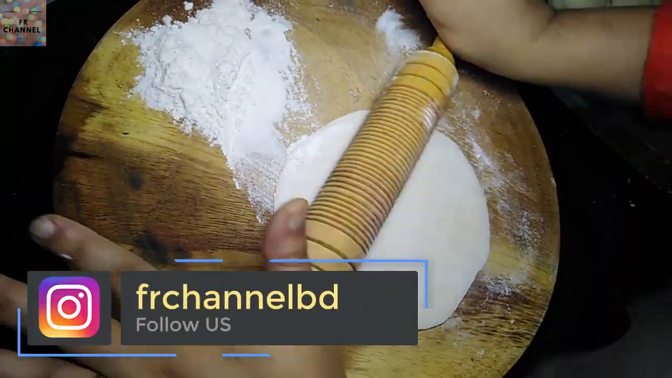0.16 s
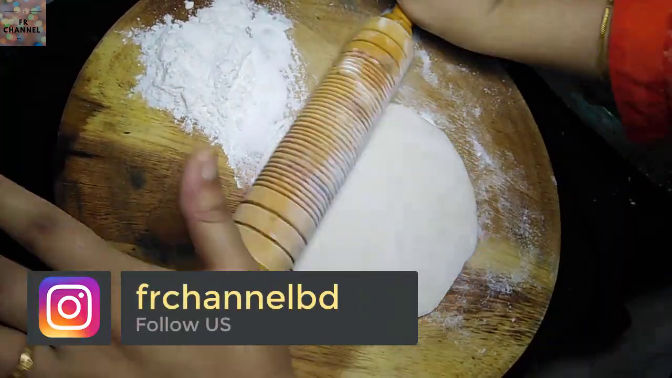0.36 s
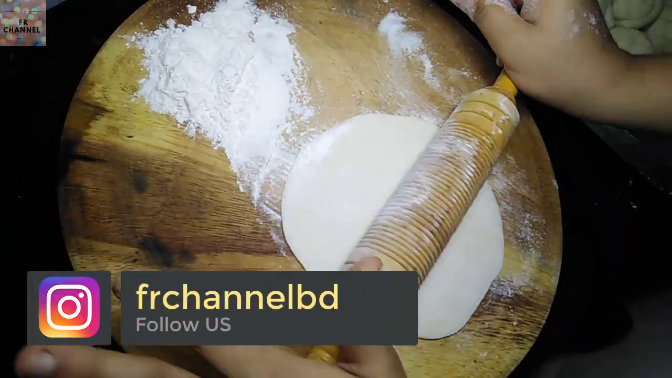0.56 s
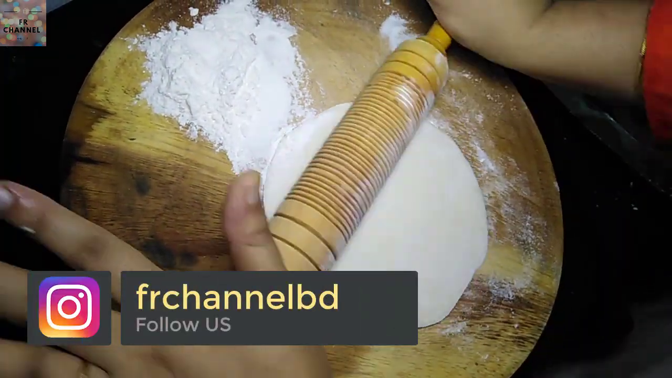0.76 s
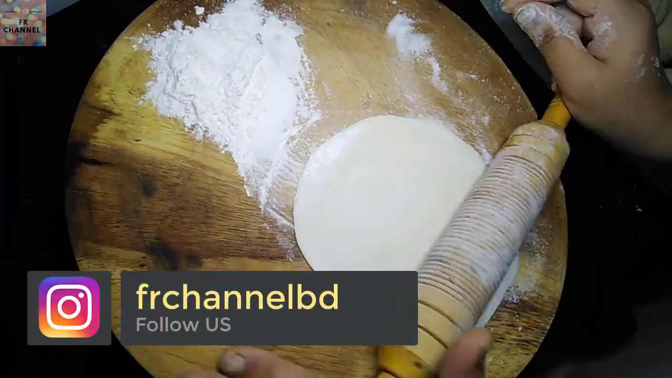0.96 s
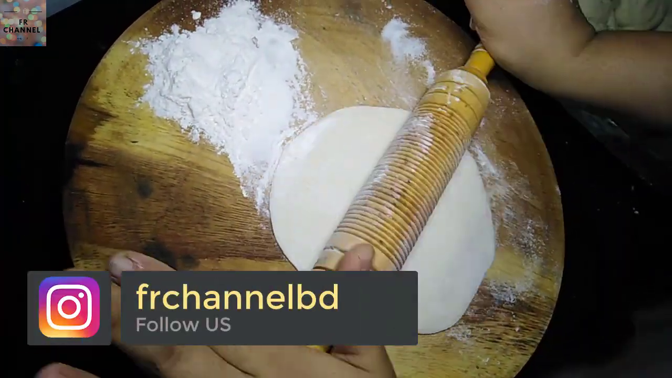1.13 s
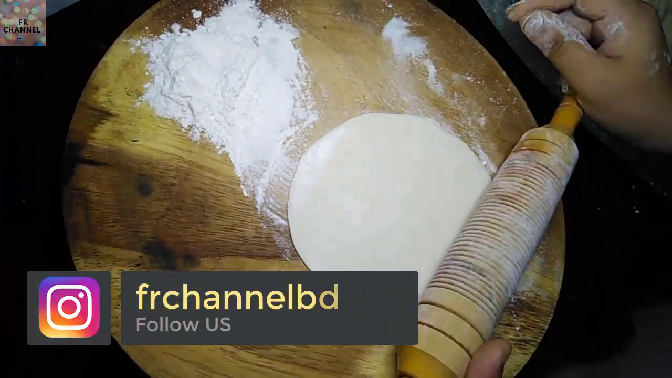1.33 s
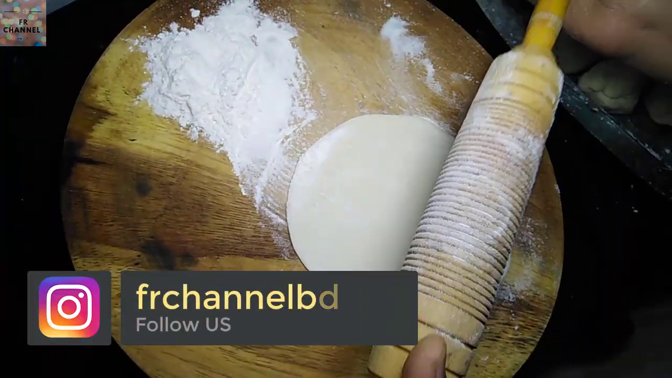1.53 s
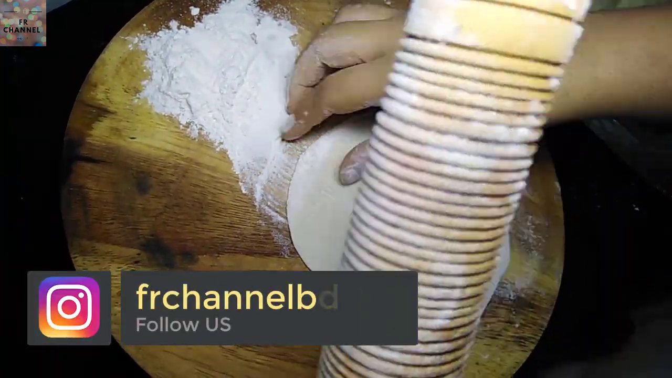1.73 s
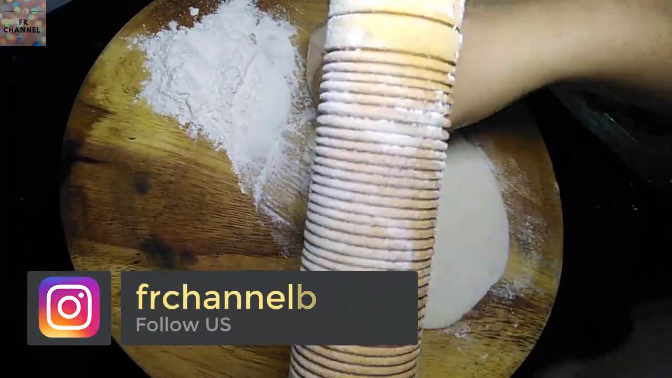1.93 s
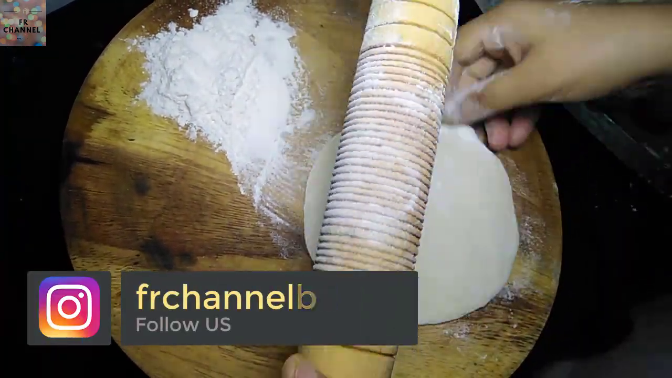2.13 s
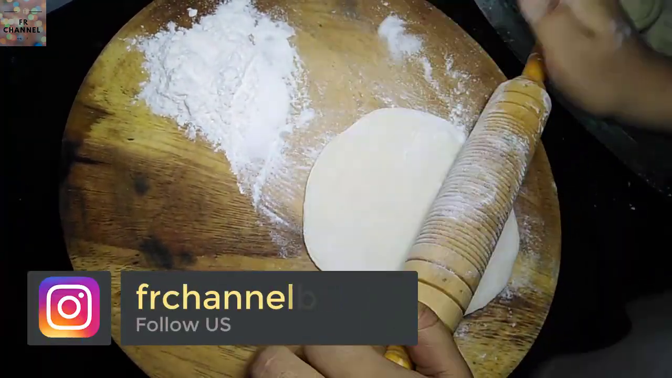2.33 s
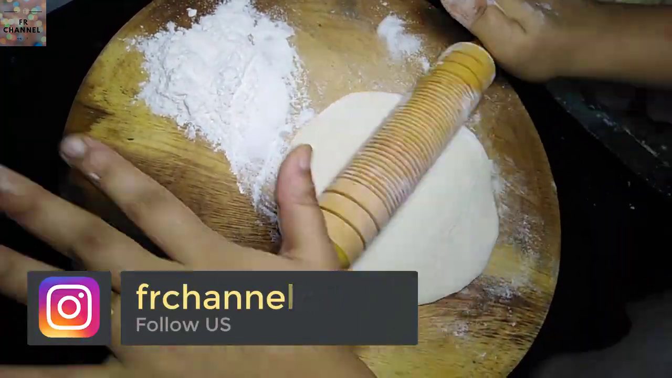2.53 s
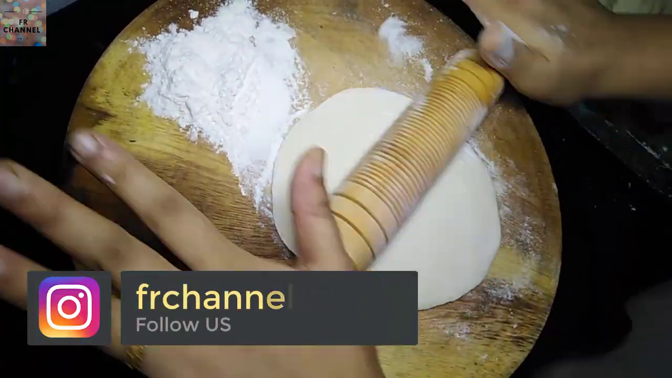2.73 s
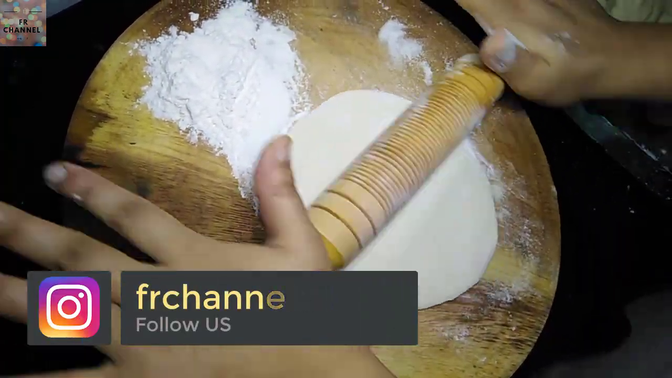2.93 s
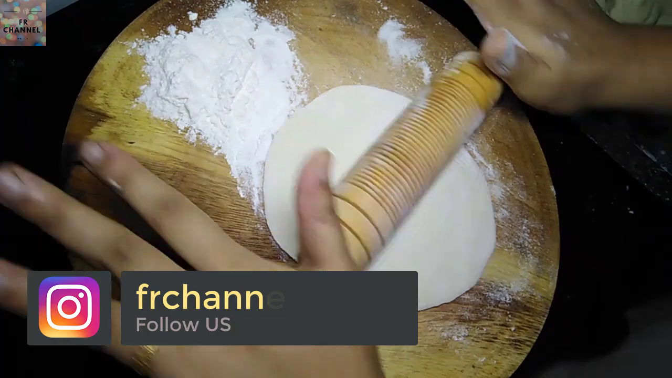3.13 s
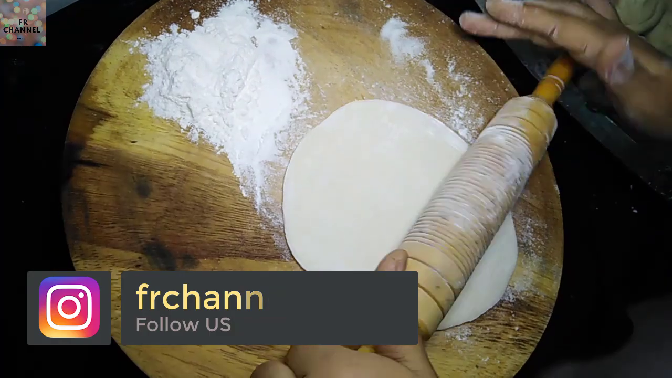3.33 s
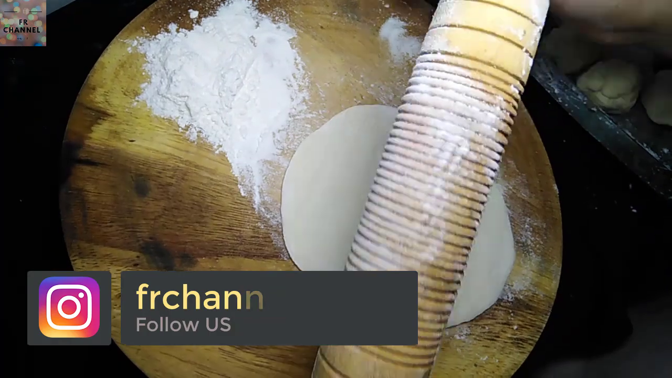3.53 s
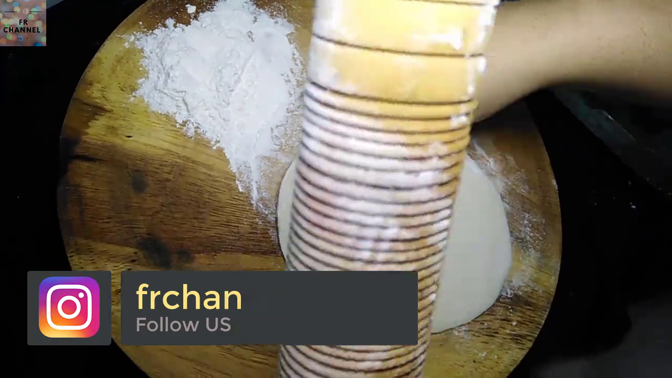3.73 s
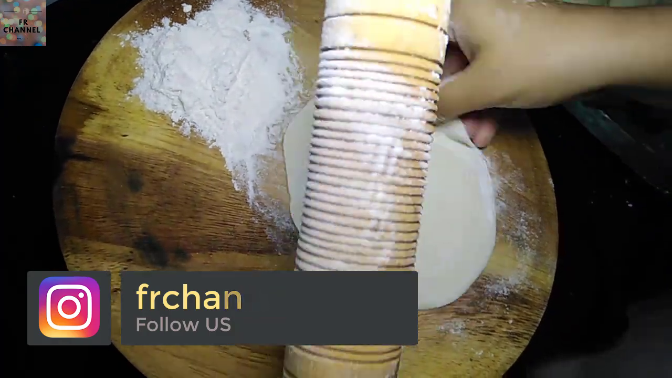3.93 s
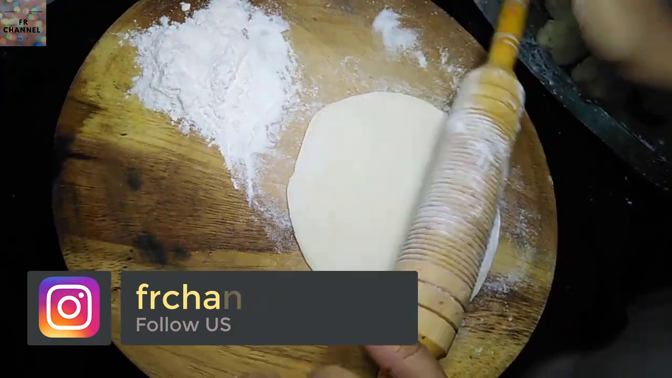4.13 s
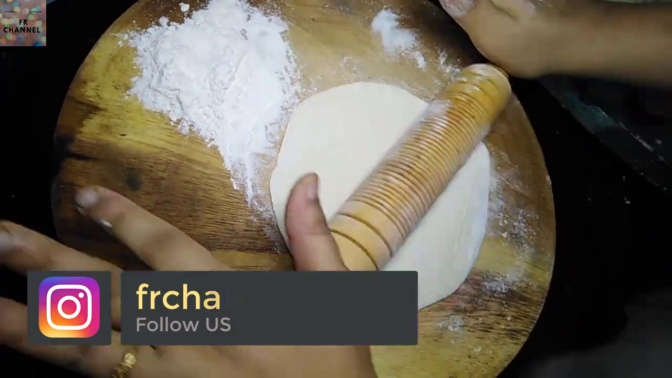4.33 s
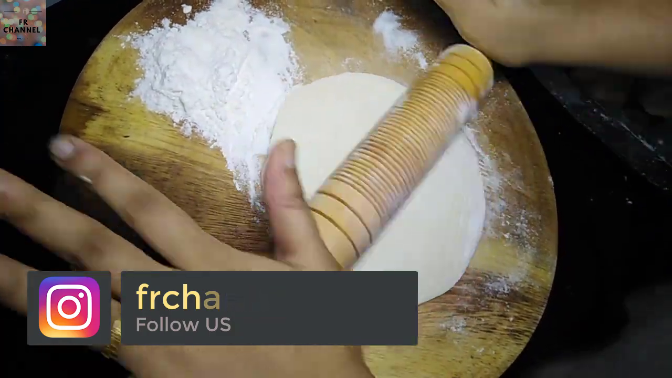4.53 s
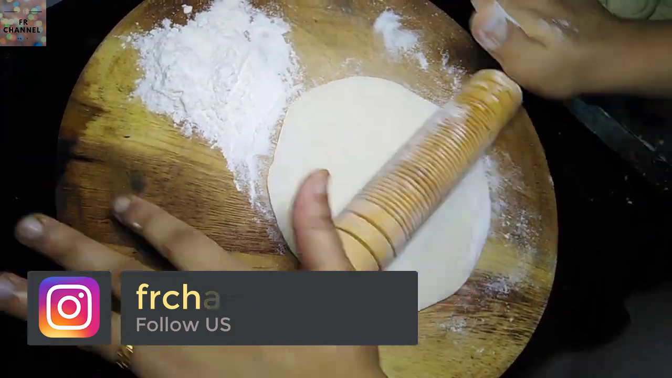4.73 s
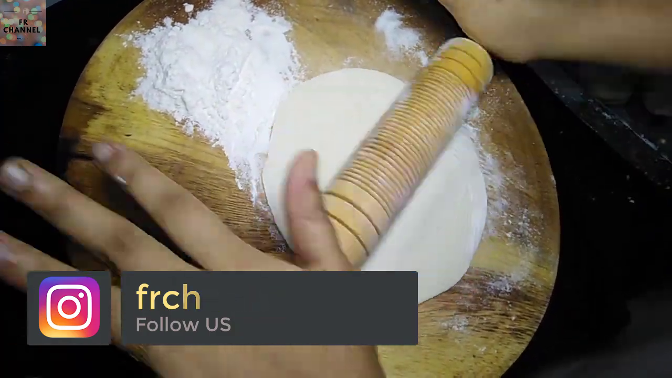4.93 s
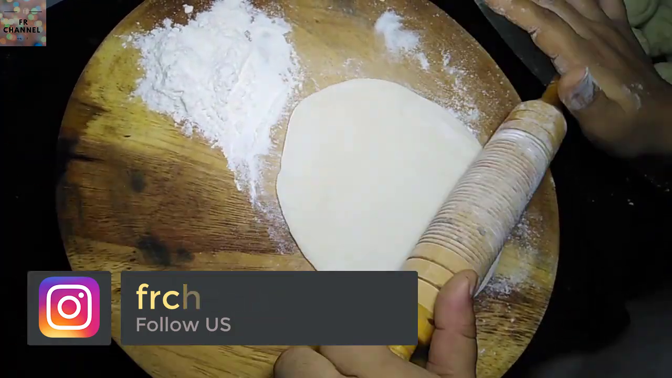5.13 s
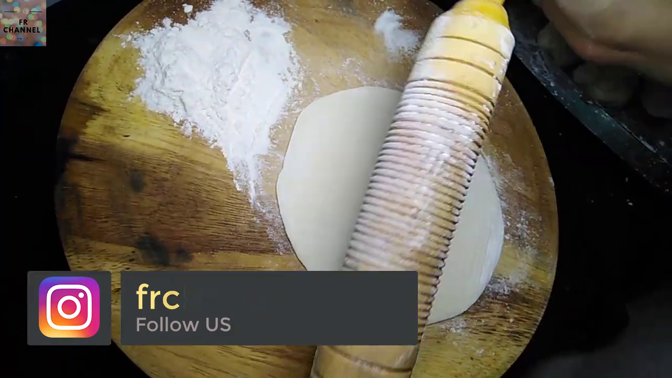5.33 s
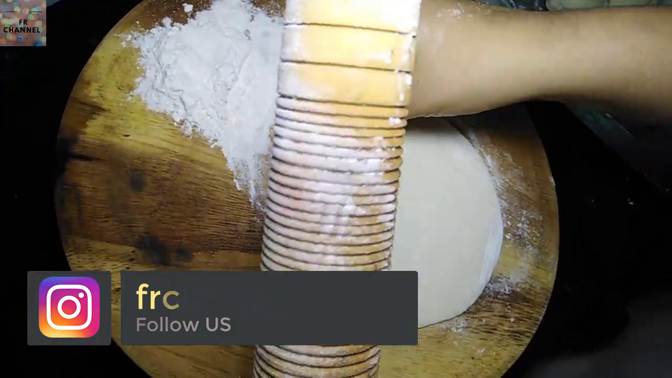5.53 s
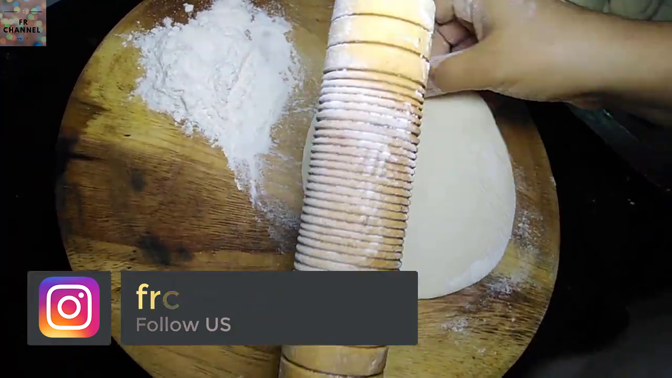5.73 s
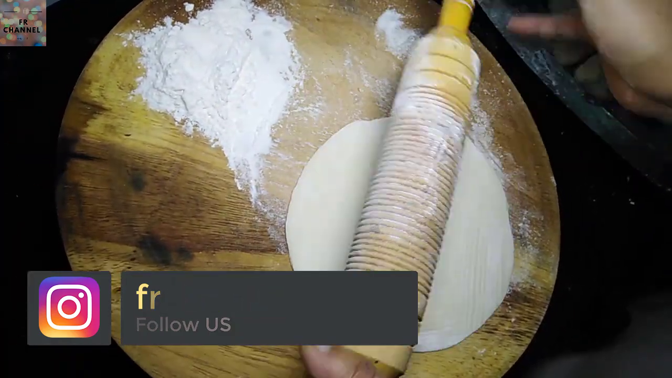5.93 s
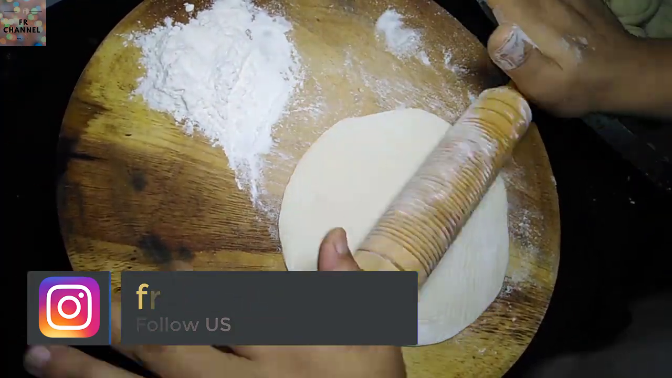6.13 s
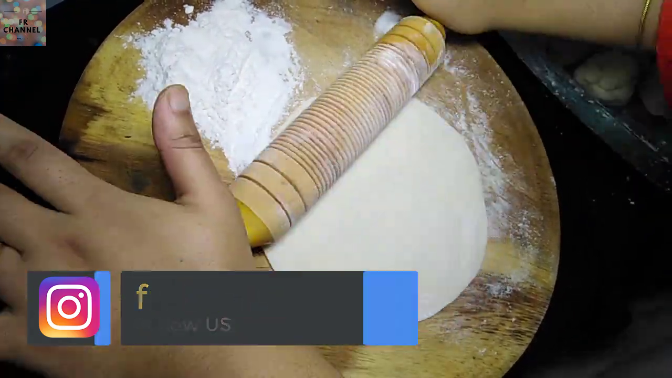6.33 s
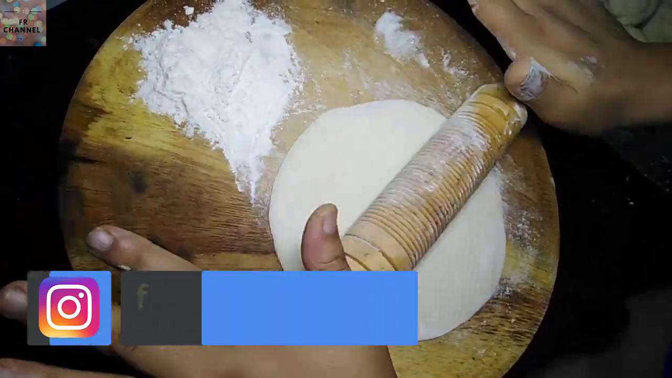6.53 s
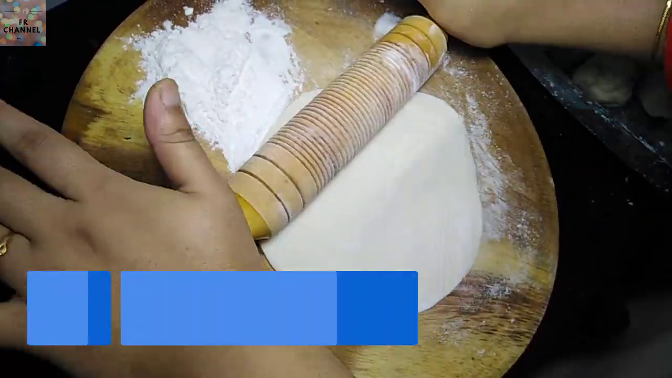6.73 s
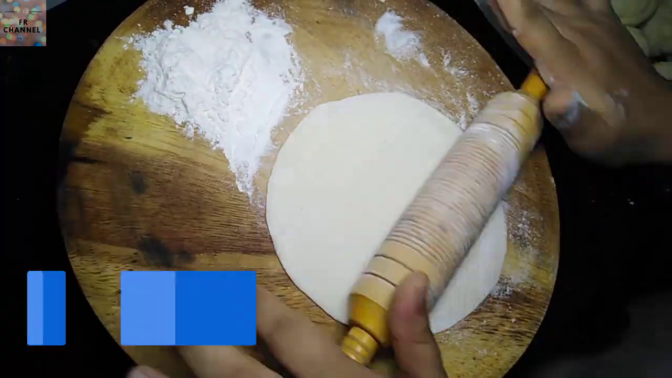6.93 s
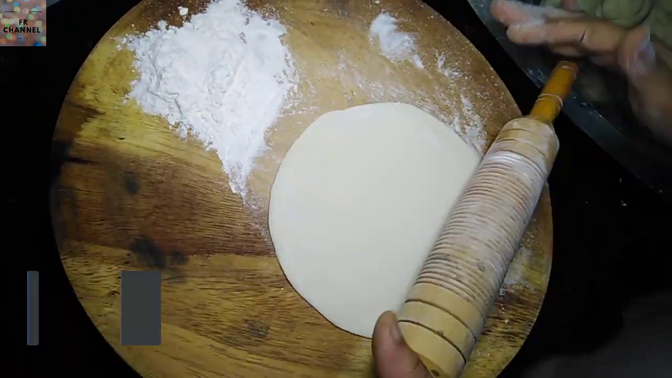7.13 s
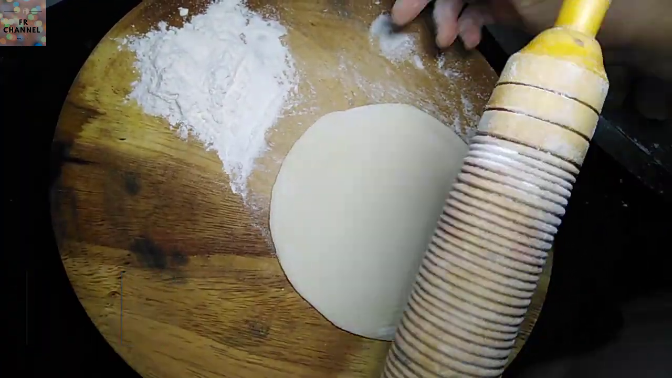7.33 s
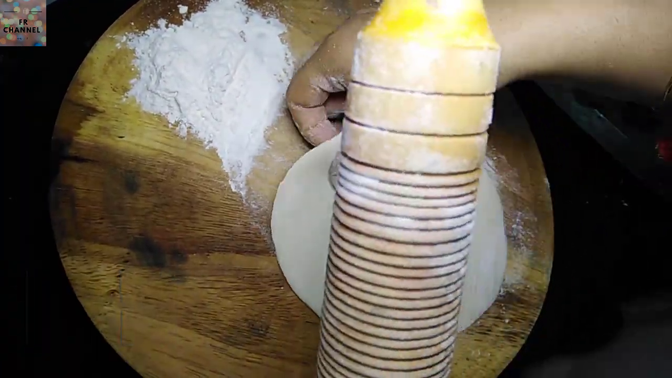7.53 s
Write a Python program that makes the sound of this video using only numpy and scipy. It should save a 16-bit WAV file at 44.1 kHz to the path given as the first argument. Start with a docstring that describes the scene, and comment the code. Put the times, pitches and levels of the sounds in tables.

```python
"""A grooved wooden rolling pin rolls over floured dough on a round wooden board in a quiet kitchen.
Grains under the pin keep the wood humming; the pin thuds down, knocks, and ticks as its grooves pass an edge.
Flour hisses under the palms and the sliding dough, skin catches on the handle, the pressed board creaks
and bangles jingle once. Two small microphone ports close by each favour their own part of the treble."""
import sys
import numpy as np
from scipy import signal
from scipy.fft import rfft, irfft, next_fast_len
from scipy.io import wavfile
from scipy.ndimage import uniform_filter1d, map_coordinates

SR = 44100
rng = np.random.default_rng(int(sys.argv[2]) if len(sys.argv) > 2 else 0)


def to_wav(sig):
    """Store sig (one row per channel, or 1-D mono) as 16-bit WAV at the path in sys.argv[1].

    Samples outside -1..1 are clipped; the rate is SR.
    """
    pcm = np.clip(np.atleast_2d(sig), -1, 1) * 32767
    pcm = np.round(pcm).astype(np.int16)
    wavfile.write(sys.argv[1], SR, pcm.T)  # frames by channels


N = 334278
OPPOSITE = np.array([[1], [-1]])   # adds a signal on the left and subtracts it on the right


def amp(db):
    """Turn decibels into a gain to multiply by."""
    return 10 ** (np.asarray(db) / 20)


def rms_one(x):
    """Scale a signal to an average power of 1."""
    return x / np.sqrt(np.mean(x ** 2) + 1e-20)


def pan(db):
    """Left and right gains that make the left louder by db."""
    return amp(np.array([db / 2, -db / 2]))


def at_hz(points, hz):
    """Read a curve between its (frequency, value) points, on a scale of octaves."""
    points_hz, values = np.transpose(points)
    return np.interp(np.log(hz), np.log(points_hz), values)


def cut_below(x, hz, order):
    """Filter out the sound below hz; a higher order cuts more steeply."""
    return signal.sosfilt(signal.butter(order, hz, "high", fs=SR, output="sos"), x)


def drift(rate_hz):
    """A slow random wander, about 1 in size."""
    step, warm_up = 40, 2000
    pole = np.exp(-2 * np.pi * rate_hz * step / SR)
    noise = rng.standard_normal(N // step + warm_up + 2)
    slow = signal.lfilter([1], [1, -2 * pole, pole * pole], noise)[warm_up:]
    return np.interp(np.arange(N) / step, np.arange(len(slow)), rms_one(slow))


def ring(force, modes, ring_scale=1):
    """A force rings an object's modes, its natural notes: each fades 60 dB in ring time * ring_scale."""
    out = 0
    for k, (hz, level_db, ring_s) in enumerate(modes):
        decay = amp(-60 / (ring_s * ring_scale * SR))
        angle = 2 * np.pi * hz / SR
        gain = (-1) ** k * amp(level_db) * np.sin(angle)   # neighbours swing opposite ways
        out = out + signal.lfilter([0, gain], [1, -2 * decay * np.cos(angle), decay ** 2], force + 1e-18)
    return out


def blows(times, level_db, hard_hz):
    """The force of blows: the harder the contact, the shorter the push."""
    force, t = np.zeros(N), np.arange(1024) / SR
    force[np.round(times * SR).astype(int)] = amp(level_db)
    push = t * np.exp(-2 * np.pi * hard_hz * t)
    return signal.oaconvolve(force, push / push.sum())[:N]


def bursts(times, gains, decay_s):
    """Left and right loudness curves that jump up at once and die away."""
    starts = np.zeros((2, N))
    starts[:, np.round(times * SR).astype(int)] = gains
    return signal.lfilter([1], [1, -np.exp(-1 / (decay_s * SR))], starts + 1e-18)


def swells(times, rise_s, fall_s, levels_db, roundness=1):
    """One loudness curve per list of levels: each movement rises 20 dB to its peak and falls 20 dB."""
    t = np.arange(0, N + 32, 32) / SR
    from_peak = t - times[:, None]
    span_s = np.maximum(np.where(from_peak < 0, rise_s[:, None], fall_s[:, None]), .002)
    power = amp(-40 * np.abs(from_peak / span_s) ** roundness)
    return [np.interp(np.arange(N) / SR, t, np.sqrt(amp(2 * db) @ power)) for db in levels_db]


def shaking_after(times, levels_db, rule):
    """Peak times, rises, falls and levels of the shaking that follows each blow."""
    delay_s, rise_s, fall_s, *offsets_db = rule
    same = np.ones(len(times))
    shaking_db = [db + offset for db, offset in zip(levels_db, offsets_db)]
    return np.array([times + delay_s, rise_s * same, fall_s * same, *shaking_db])


def grains(per_s, spread_db):
    """Two pairs of streams of tiny random clicks of uneven size."""
    sizes = amp(spread_db * np.minimum(rng.exponential(1, (4, N)), 4))
    signs = rng.choice([-1, 1], (4, N))
    touching = rng.random((4, N)) < per_s / SR
    return (sizes * signs * touching).reshape(2, 2, N) + 1e-9


# how alike left and right sound: (frequency [Hz], likeness [0 to 1])
STEREO_LIKENESS = [(100, 0.77), (400, 0.64), (800, 0.27), (2000, 0.021), (5000, 0.028), (12000, 0.096)]
def coloured(source, spectrum, flicker_db):
    """Shape noise into a stereo sound, in bands a third of an octave wide that can flicker in level."""
    out, shared_flicker = 0, drift(34.0)
    lowest_hz, highest_hz = spectrum[0][0], spectrum[-1][0]
    edges = lowest_hz * 2 ** np.arange(0, np.log2(highest_hz / lowest_hz) + .2, 1 / 3)
    for k, (low, high) in enumerate(zip(edges, edges[1:])):
        band = signal.butter(2, [low, high], "band", fs=SR, output="sos")
        mid, side = signal.sosfilt(band, source[k % 2])
        hz = np.sqrt(low * high)
        alike = at_hz(STEREO_LIKENESS, hz)
        gain = amp(at_hz(spectrum, hz) + flicker_db * (0.623 * shared_flicker + drift(6.3)))
        out = out + gain * (np.sqrt(1 + alike) * mid + np.sqrt(1 - alike) * side * OPPOSITE)
    return rms_one(out)


# the tone of the quiet room: (frequency [Hz], relative level [dB])
ROOM_SPECTRUM = [(29, -28), (50, -9.5), (101, 7.5), (581, -26.5), (718, -31.5), (1030, -5), (1350, -7.5),
                 (1700, -2.5), (2300, -10.5), (3740, -31), (7070, 7), (9830, -5), (14000, -55)]
def room_tone():
    """A faint noise that fills the kitchen."""
    return amp(-77) * coloured(rng.standard_normal((2, 2, N)), ROOM_SPECTRUM, flicker_db=1.5)


def wall_echoes(x, ring_s=0.08):
    """Echoes off the walls blur into a short fading noise, a different one for each side."""
    t = np.arange(SR // 2) / SR
    tail = rng.standard_normal((2, len(t))) * amp(-60 * t / ring_s) * (t > .004)
    tail /= np.sqrt(np.sum(tail ** 2) / 2)
    return signal.fftconvolve(x[None], tail, axes=1)[:, :N]


# the notes of the bangles: (pitch [Hz], level [dB], ring time before scaling [s])
BANGLE_MODES = [(5230, -12, .06), (5550, -5.5, 0.14), (5930, -1, .14), (6330, -7, .12), (6570, -7, 0.13),
                (6840, -2.5, .15), (7140, -9.5, 0.17), (7270, -6.5, .14), (8400, -5.5, .1),
                (8940, -8, 0.12), (9700, -20, .14), (10780, -15.5, 0.13), (11160, -23.5, 0.11),
                (12500, -28, .1)]
# bangles touching: (time [s], strength [dB])
BANGLE_TOUCHES = [(2.0643, -48.5), (2.0661, -41.5), (2.074, -41), (2.087, -60), (2.105, -46),
                  (2.121, -48.5), (2.135, -49.5), (2.1853, -57), (2.213, -57), (2.249, -41), (2.262, -46),
                  (2.28, -45.5), (2.297, -49), (2.32, -57)]
def bangles():
    """Metal bangles clink together; each touch strikes every note with a strength of its own."""
    starts = [round(time * SR) for time, _ in BANGLE_TOUCHES]
    strength_db = np.array(BANGLE_TOUCHES)[:, 1:] + rng.normal(0, 4.4, (len(starts), len(BANGLE_MODES)))
    out = 0
    for k, mode in enumerate(BANGLE_MODES):
        clicks = np.zeros(N)
        clicks[starts] = amp(strength_db[:, k])
        out = out + ring(clicks, [mode], ring_scale=0.5)
    return cut_below(out, 4800, order=4)


# the notes of one tick: (pitch [Hz], level [dB], ring time [s])
GROOVE_MODES = [(693, -21.5, .04), (2920, -22.5, 0.008), (4440, -16, 0.0016), (6890, -15.5, 0.011),
                (9500, -22, 0.0012), (12600, -29, 0.0016)]
# grooves passing an edge: (time [s], strength [dB])
GROOVE_SNAPS = [(.4425, -30), (.453, -29.5), (.8528, -36.5), (.8545, -33.5), (.8612, -33), (1.162, -35),
                (1.1715, -36.5), (1.18, -37), (1.1935, -32), (1.2055, -35), (1.2115, -34.5), (1.217, -39),
                (1.2265, -39.5), (1.245, -40)]
def groove_ticks():
    """The pin's grooves snap past an edge on the right; each tiny burst of noise rings briefly."""
    times, level_db = np.transpose(GROOVE_SNAPS)
    snaps = bursts(times, amp(level_db) * pan(-5.5)[:, None], decay_s=0.0017)
    return ring(snaps * rng.choice([-1, 1], N), GROOVE_MODES)


# rubs and creaks; rise and fall are held between 0.005 and 0.3 s when played:
# (peak time [s], rise [s], fall [s], pitch [Hz], width before scaling [Hz], level [dB])
RUBS = [(.13, 0.086, 0.2, 3000, 220, -57), (.22, .01, .02, 3000, 670, -67), (.38, 0.064, 1, 2620, 460, -64),
        (.62, 0.13, 0.02, 2990, 260, -60), (.79, 0.07, 0.3, 2993, 350, -59),
        (0.779, 0.043, 0.41, 1200, 67, -71.5), (1.02, .06, 0.3, 3185, 300, -65),
        (1.245, 0.016, 0.07, 2900, 250, -55.5), (1.36, 0.087, 0.14, 2644, 187, -74),
        (1.6, 0.0086, -0.4, 1650, 80, -67), (1.659, 0.022, -0.13, 1390, 180, -54),
        (1.74, 0.079, 0.1, 1250, 160, -65.5), (1.97, 0.054, 0.1, 1686, 200, -59.5),
        (2.075, 0.015, 0.2, 2710, 83, -54), (2.12, 0.029, 0, 1215, 160, -56),
        (2.195, 0.0227, 0.36, 2820, 150, -62), (2.719, 0.044, 0.2, 1590, 140, -64.5),
        (3.185, 0.0173, 0.1, 2130, 240, -51), (3.4, 0.025, 1, 2250, 220, -64.5),
        (3.409, 0.035, 0.21, 1763, 185, -63.5), (3.61, 0.077, 0, 1700, 240, -59),
        (3.789, 0.024, .1, 1950, 290, -58), (3.861, 0.072, 0.1, 1702, 120, -56.5),
        (4.009, 0.032, .08, 1500, 150, -70), (3.845, .03, 0.13, 1390, 130, -56),
        (4.02, 0.032, 0.2, 1070, 58, -69), (4.008, .02, .04, 3000, 200, -66),
        (4.597, .02, 0.4, 267, 23, -49), (4.605, 0.021, -0.2, 91, 12, -47),
        (4.66, 0.067, -0.2, 96, 12, -54), (4.628, 0.058, 0, 606, 26, -46.5),
        (4.605, 0.079, 0.2, 900, 200, -55), (4.71, 0.031, -0.06, 1070, 190, -64),
        (4.692, 0.012, 0.04, 266, 18, -42), (4.9, 0.033, .08, 2220, 188, -72),
        (4.89, 0.037, 0, 1650, 260, -72), (5.18, 0.16, 0.1, 1028, 34, -77.5),
        (5.11, .12, 0.2, 498, 40, -70.5), (5.315, 0.016, .12, 488, 23, -61),
        (5.4, .08, 0.2, 490, 27, -66.5), (5.311, 0.0145, 0.1, 1034, 53, -58),
        (5.312, 0.013, -0.24, 1690, 120, -58.5), (5.379, 0.022, .06, 1058, 59, -68),
        (5.372, 0.017, .06, 1700, 68, -65.5), (5.48, 0.044, -1, 1745, 62, -66),
        (5.58, .05, .05, 1720, 60, -66), (5.68, 0.041, .12, 2200, 90, -62),
        (5.71, 0.12, -0.3, 1710, 150, -69), (5.799, 0.076, 0.1, 1120, 79, -64),
        (5.968, 0.011, 0.17, 484, 160, -39.5), (6.12, 0.065, -2, 2630, 370, -61.5),
        (6.4, 0.23, 0.2, 469, 62, -61.5), (6.761, 0.036, 0.4, 609, 34, -61.5),
        (6.77, 0.071, 0.07, 1115, 58, -68.5), (7.005, 0.048, 3, 1100, 150, -66),
        (7.57, 0.037, .1, 1885, 210, -70)]
def rubs_and_creaks():
    """A rub, or the creak of the pressed board, makes contact noise ring at one pitch for a moment."""
    out, span = np.zeros((2, N + SR)), SR // 2
    from_peak = np.arange(span) / SR - .15
    noise = rng.standard_normal((len(RUBS), 2, span))
    for (time, rise_s, fall_s, hz, width_hz, level_db), source in zip(RUBS, noise):
        mode = [(hz, 0, np.log(1000) / (np.pi * width_hz * 1.5))]
        tone = rms_one(ring(ring(source, mode), mode))
        power = uniform_filter1d(tone ** 2, size=round(2 * SR / hz)) + .05
        steadiness = 0.88 if hz < 700 else 0.25   # low creaks waver less than high rubs
        mid, side = rms_one(tone / power ** (steadiness / 2))
        stereo_width = 0.64 * (1 - at_hz(STEREO_LIKENESS, hz))
        slope_s = np.clip(np.where(from_peak < 0, rise_s, fall_s), .005, .3)
        swell = amp(level_db - 20 * np.abs(from_peak / slope_s) ** 1.16)
        start = round((time + .35) * SR)   # 0.5 s of padding, less the 0.15 s before the peak
        out[:, start:start + span] += swell * (mid + stereo_width * side * OPPOSITE)
    return out[:, span:span + N]


def narrow_band_flicker(x, depth_db, width_hz=169.9, life_s=.07):
    """Narrow bands of the hiss and scrape swell and fade at random."""
    hz, t, cells = signal.stft(x, SR, nperseg=1024)
    grid = np.meshgrid(hz / width_hz, t / life_s, indexing="ij")
    patches = map_coordinates(rng.standard_normal((400, 400)), grid, order=1, mode="mirror")
    _, shaped = signal.istft(cells * amp(depth_db * rms_one(patches)), SR, nperseg=1024)
    return rms_one(shaped[:, :N])


# the tone of the fine hiss and of the coarse scrape: (frequency [Hz], relative level [dB])
HISS_SPECTRUM = [(2060, -13.5), (3500, -13.5), (4050, -11.5), (5740, -8), (7180, 0.5), (8920, -8),
                 (11600, -15), (14000, -23), (14500, -15.5), (14800, -39)]
SCRAPE_SPECTRUM = [(880, -34), (1500, -9.5), (1740, -1.5), (1900, -9), (2120, -1.5), (3870, -11),
                   (5000, -8), (6500, -42), (11000, -120)]
# strokes of the pin: (peak time [s], rise [s], fall [s], hiss [dB], scrape [dB], left minus right [dB],
# low pin hum [dB], middle pin hum [dB], high pin hum [dB])
PIN_STROKES = [(0.0, 0.022, 0.059, -54, -64.5, -3.5, -58, -80, -71),
               (0.127, 0.12, 0.19, -48, -53.5, -0.5, -64.5, -59.5, -65.5),
               (0.378, 0.077, 0.103, -44.5, -52, -2.5, -72, -62, -68),
               (0.44, 0.13, 0.082, -54, -55, -2, -55, -55, -62),
               (0.619, 0.11, 0.066, -47.5, -64, -3, -85, -60, -67.5),
               (0.772, 0.0543, 0.1, -45.5, -61, -2.5, -105, -74, -85),
               (0.849, 0.1, 0.044, -47.5, -58, -7, -77, -49.5, -83),
               (1.019, 0.17, 0.078, -50.5, -61, -3, -55, -60, -63),
               (1.184, 0.11, 0.17, -49.5, -60, -4, -61, -58.5, -86),
               (1.36, 0.27, 0.1526, -61, -63, -1.5, -84, -84, -67.5),
               (1.66, 0.045, 0.1203, -54, -61, -2, -72, -71, -56),
               (1.748, 0.057, 0.063, -56.5, -89.5, -1, -95.5, -81, -71.5),
               (1.94, 0.12, 0.22, -48.5, -55.5, -2, -96, -77, -58.5),
               (2.077, 0.015, 0.13, -44.5, -55, -4, -68, -66, -67.5),
               (2.232, 0.09, 0.36, -46, -57.5, -2.5, -60.5, -55.5, -64),
               (2.359, 0.028, 0.49, -85, -56, -0.0, -64.5, -64, -61.5),
               (2.633, 0.092, 0.039, -53.5, -61, 0, -69, -65, -72),
               (2.717, 0.15, 0.0504, -59, -56.5, 0.5, -87, -68, -69),
               (2.876, 0.062, 0.14, -49.5, -62, 1.5, -74, -72.5, -63),
               (2.951, 0.042, 0.08, -73, -52, 5.5, -65, -54.5, -53.5),
               (3.065, 0.098, 0.17, -56, -58.5, 2.5, -96.5, -69, -63.5),
               (3.187, 0.031, 0.18, -77, -55, 2.0, -72, -65.5, -87.5),
               (3.26, 0.094, 0.0785, -59, -59, 2, -63, -66, -68.5),
               (3.401, 0.032, 0.072, -61.5, -55.5, 3, -79.5, -93, -84),
               (3.52, 0.016, 0.17, -54.5, -74.5, -1.5, -74, -59, -82),
               (3.606, 0.092, 0.089, -57, -57, 2, -75, -77, -65),
               (3.826, 0.071, 0.15, -47, -53.5, -2.5, -103, -74, -60),
               (4.004, 0.038, 0.2, -63.5, -60.5, 2.5, -100.5, -101, -76),
               (4.111, 0.028, 0.0993, -49.5, -53, -1, -53.5, -55.5, -64),
               (4.282, 0.2, 0.24, -52, -60.5, -0.5, -70, -73, -61.5),
               (4.516, 0.12, 0.11, -51.5, -54.5, -1.5, -62.5, -64.5, -67),
               (4.701, 0.094, 0.11, -50.5, -67, -1.5, -62, -63.5, -65),
               (4.892, 0.0587, 0.11, -49, -57.5, -4, -83.5, -59, -76),
               (5.029, 0.025, 0.044, -69, -60.5, -4.5, -67.5, -64, -85),
               (5.092, 0.049, 0.098, -54.5, -59, -4, -66.5, -66.5, -83),
               (5.31, 0.015, 0.22, -56, -87, -2.5, -72.5, -99.5, -71.5),
               (5.39, 0.21, 0.022, -64.5, -89.5, 2, -84.5, -101, -90),
               (5.477, 0.052, 0.18, -55, -81.5, -4, -76, -71, -65),
               (5.705, 0.22, 0.153, -51.5, -55.5, -1.5, -94.5, -76, -64),
               (5.951, 0.023, 0.0924, -46.5, -50, -4.5, -53.5, -62, -61.5),
               (6.117, 0.15, 0.39, -52.5, -53.5, 0.5, -60.5, -63, -62),
               (6.378, 0.17, 0.075, -52.5, -59, -2, -67, -77.5, -73),
               (6.571, 0.046, 0.11, -52.5, -74, 1, -89, -60, -62),
               (6.769, 0.0564, 0.13, -50.5, -58, -2, -84, -69, -71),
               (6.863, 0.096, 0.11, -61, -63.5, 3.5, -67, -61.5, -78),
               (7.002, 0.038, 0.13, -50.5, -55.5, -2.5, -61.5, -55.5, -72),
               (7.33, 0.019, 0.044, -58.5, -80.5, 0, -72, -93, -63.5),
               (7.389, 0.023, 0.099, -56, -59, -2.5, -64, -55.5, -55),
               (7.571, 0.046, 0.054, -53.5, -58, -5, -89, -86.0, -70.5)]
STROKE_ROUNDNESS = 1.576   # above 1, a stroke has a rounded peak
def flour_friction():
    """Flour grains slip under palms and dough, making a fine hiss and a coarser scrape."""
    times, rise_s, fall_s, hiss_db, scrape_db, pan_db = np.transpose(PIN_STROKES)[:6]
    levels_db = [hiss_db + pan_db / 2, hiss_db - pan_db / 2, scrape_db]
    left, right, scrape_gain = swells(times, rise_s, fall_s, levels_db, STROKE_ROUNDNESS)
    fine = coloured(grains(per_s=9000, spread_db=2.5), HISS_SPECTRUM, flicker_db=1.5)
    hiss = narrow_band_flicker(fine, depth_db=2.2)
    coarse = coloured(grains(per_s=3000, spread_db=1.5), SCRAPE_SPECTRUM, flicker_db=1.5)
    scrape = narrow_band_flicker(coarse, depth_db=4.2)
    return np.array([left, right]) * hiss + scrape_gain * scrape


# skin catching on the handle: (time [s], peak level [dB], left minus right [dB])
SKIN_CATCHES = [(0.098, -33, -10), (0.5386, -45, -1.5), (0.726, -43.5, 3), (1.586, -54, -7.5),
                (1.6392, -42.5, -4), (1.69, -42, 9), (1.795, -47, 0), (2.606, -44.5, -10),
                (3.2287, -41, -4), (3.263, -40.5, -2), (3.38, -53, -12), (3.503, -49.5, -2),
                (3.5107, -38.5, -3.5), (3.972, -44, -7), (4.1, -36, -8), (4.409, -48, -9.5),
                (4.4837, -49, -15), (5.025, -45.5, -7), (5.0864, -50, 8), (5.302, -35.5, 0.5),
                (5.93, -44, -2.5), (5.961, -39, -2), (6.691, -50.5, -2.5), (6.736, -46, 0),
                (7.321, -44.5, -6), (7.372, -42.5, -7.5)]
def skin_catches(peak_over_average_db=9):
    """Skin catches on the handle and lets go in a quick hiss of tiny slips."""
    times, peak_db, pan_db = np.transpose(SKIN_CATCHES)
    slips = bursts(times, amp(peak_db - peak_over_average_db) * pan(pan_db), decay_s=0.011)
    return slips * coloured(rng.standard_normal((2, 2, N)), HISS_SPECTRUM, flicker_db=0)


# the notes of the pin: (pitch [Hz], level [dB], ring time before scaling [s])
PIN_MODES = [(461, -9.5, 0.056), (527, -10, 0.047), (606.7, -13, 0.0912), (691, 2.5, 0.028),
             (771, -1, 0.029), (1069.5, -2.5, 0.042), (1224, 2, 0.025), (1713.4, -3.5, 0.056),
             (2142, -10, 0.11), (2770, -23, 0.04)]
PIN_LOW, PIN_MIDDLE, PIN_HIGH = PIN_MODES[:3], PIN_MODES[3:5], PIN_MODES[5:]
# small knocks on the pin: (time [s], strength [dB], extra for the high notes [dB])
PIN_KNOCKS = [(0.942, -20.5, -17.5), (1.639, -58, 9), (1.648, -55, 13.5), (1.663, -44, -2), (2.116, -51, 5),
              (2.246, -29, -7.5), (2.937, -49, 0), (3.131, -33.5, -31), (3.151, -36.5, -32.5),
              (3.51, -31.5, 1.5), (3.523, -48, 0), (3.563, -53.5, 6), (3.573, -40.5, -14),
              (3.594, -51.5, 7), (4.101, -26, -11), (4.571, -37.5, -24), (4.908, -41.5, -17.5),
              (4.945, -41, -14), (5.025, -47, -19.5), (5.49, -42.5, -6.5), (5.9538, -43.5, 6.5),
              (5.9564, -25, -18), (6.692, -60, -14), (6.842, -34.5, -24), (6.858, -42.5, -23),
              (6.979, -46, -8), (7.321, -61, 6), (7.374, -41, -1), (7.392, -36, -24.5), (7.407, -52, 5)]
def pin_knocks():
    """Knocks ring the pin, muffled by the hands; where it is struck sets how bright it sounds."""
    times, level_db, high_db = np.transpose(PIN_KNOCKS)
    dull = ring(blows(times, level_db, hard_hz=1430), PIN_LOW + PIN_MIDDLE, ring_scale=0.59)
    bright = ring(blows(times, level_db + high_db, hard_hz=2150), PIN_HIGH[:2], ring_scale=0.61)
    top = ring(blows(times, level_db + 1.35 * high_db, hard_hz=2600), PIN_HIGH[2:], ring_scale=.4)
    return cut_below(dull + bright + top, 294.2, order=2)   # the slim pin sends out no bass


# the notes of the board, six low then four high: (pitch [Hz], level [dB], ring time when struck [s])
BOARD_MODES = [(90.5, -22, 0.62), (115.4, -3.5, 0.15), (137.8, -10, 0.55), (156.7, 2.5, 0.1884),
               (186.5, -4, 0.28), (200.1, -4, 0.16), (222.4, -18, 0.35), (252.7, -20, 0.29),
               (285.3, -21.5, 0.52), (345, -1.5, 0.037)]
BOARD_SWINGS = (1, -1, 1, 1, -1, 1, 1, -1, 1, -1)   # the way each note swings where the pin lands: (direction [+1 or -1])
# the pin laid down or bumped: (time [s], strength [dB], extra for the high notes [dB], shudder [dB])
PIN_THUDS = [(0.941, -23, 5, -36), (2.243, -23, 2, -31), (3.573, -45.5, -32.5, -82),
             (4.1, -22.5, 1.5, -30.5), (5.954, -23, -0.5, -29)]
def board_thuds(settle_s=0.0101, touch_db=-7.5):
    """The pin lands softly and rings the board: a light touch first, its weight a moment later."""
    times, level_db, high_db, _ = np.transpose(PIN_THUDS)
    touch = blows(times, level_db + touch_db, hard_hz=250)
    weight = blows(times + settle_s, level_db, hard_hz=256)
    sharp_push = blows(times, level_db + high_db, hard_hz=514)
    return sum(swing * ring(touch + weight if k < 6 else sharp_push, [mode])
               for k, (swing, mode) in enumerate(zip(BOARD_SWINGS, BOARD_MODES)))


# the board shoved or rocked: (peak time [s], rise [s], fall [s], low notes [dB], high notes [dB])
BOARD_SHOVES = [(0.001, 0.28, 0.14, -45.5, -59), (0.223, 0.158, 0.13, -50.5, -65.5),
                (0.447, 0.012, 0.32, -55, -66), (0.852, 0.06, 0.5, -56, -53.5),
                (1.28, 0.317, 0.16, -48, -52.5), (1.646, 0.07, 0.1, -47.5, -83),
                (1.965, 0.011, 0.14, -70.5, -65.5), (2.11, .02, 0, -86, -64), (2.97, 0.027, 0.26, -84, -75),
                (3.134, .01, 0.32, -91, -71), (3.517, 0.01, 0.25, -52.5, -98),
                (3.588, 0.037, 0.03, -55, -100.0), (4.591, 0.027, 0.49, -65, -58),
                (5.322, 0.0093, 0.26, -54, -71.5), (6.396, .07, 0.12, -90, -67.5),
                (6.845, .01, 0.55, -89, -77), (7.35, 0.054, .08, -60.5, -90),
                (7.42, 0.046, 0.1, -56.5, -90)]
# shaking added to a thud's shudder level: (delay [s], rise [s], fall [s], low [dB], high [dB])
BOARD_SHUDDER = [(0.122, 0.1197, 0.22, -16.5, -23.5)]
def board_shaking():
    """Loudness curves of the board's low and high notes as it is shoved or shudders after a thud."""
    thud_times, _, _, shudder_db = np.transpose(PIN_THUDS)
    shudders = [shaking_after(thud_times, [shudder_db, shudder_db], rule) for rule in BOARD_SHUDDER]
    times, rise_s, fall_s, *levels_db = np.hstack([np.transpose(BOARD_SHOVES), *shudders])
    return swells(times, rise_s, fall_s, levels_db)


# the rattle, relative to its knock: (delay [s], rise [s], fall [s], low [dB], middle [dB], high [dB])
PIN_RATTLE = (.008, .005, .022, -24, -23, -17)
def pin_shaking():
    """Loudness curves of the pin's low, middle and high notes as it rolls or rattles after a knock."""
    times, rise_s, fall_s, *levels_db = np.transpose(PIN_STROKES)
    stroked = swells(times, rise_s, fall_s, levels_db[3:], STROKE_ROUNDNESS)
    knock_times, knock_db, high_db = np.transpose(PIN_KNOCKS)
    rattles = shaking_after(knock_times, [knock_db, knock_db, knock_db + high_db], PIN_RATTLE)
    times, rise_s, fall_s, *levels_db = rattles
    return np.hypot(stroked, swells(times, rise_s, fall_s, levels_db))


# how much more a shove moves each note of the board than a blow does: (extra level [dB])
SHOVE_EXTRA_DB = (15.5, 7, 7, -1.5, -9, -19, 1, 1, 4, 5)
def rolling_pin(wander_db=5):
    """Uneven grains under the pin keep pin and board humming; each note comes and goes as it travels."""
    bumps = grains(per_s=2500, spread_db=4.0)
    shoved = [(hz, db + extra, ring_s) for (hz, db, ring_s), extra in zip(BOARD_MODES, SHOVE_EXTRA_DB)]
    groups = (PIN_LOW, PIN_MIDDLE, PIN_HIGH, shoved[:6], shoved[6:])
    stereo_widths = (0.68, 0.77, 1.0, 0.12, 0.56)
    gains = [*pin_shaking(), *board_shaking()]
    out = 0
    for k, (gain, modes, width) in enumerate(zip(gains, groups, stereo_widths)):
        mid, side = sum(amp(wander_db * drift(5.9)) * ring(bumps[k % 2], [mode], ring_scale=1.89)
                        for mode in modes)
        out = out + gain * rms_one(mid + width * side * OPPOSITE)
    return out


def scene():
    """Add up all the sounds; only the knocks and the bangles echo off the walls."""
    knocks, jingle = pin_knocks(), bangles()
    echoes = amp(-5) * wall_echoes(knocks + jingle)
    struck = board_thuds() + knocks + jingle * pan(3.3)[:, None]
    return (room_tone() + echoes + struck + rolling_pin() + flour_friction()
            + rubs_and_creaks() + skin_catches() + groove_ticks())


# how the two microphone ports differ: (frequency [Hz], left minus right [dB])
PORT_BALANCE = [(300, 1), (900, -3), (4000, 0), (6700, -6), (7700, 1), (8800, 15.5), (11000, 5.5),
                (14000, 8)]
def record(dry):
    """Each microphone port favours its own treble bands; the deep bass and the very top are cut."""
    size = next_fast_len(N)
    hz = np.maximum(np.fft.rfftfreq(size, 1 / SR), 1)
    heard = irfft(rfft(dry, size) * pan(at_hz(PORT_BALANCE, hz)), size)[:, :N]
    top_cut = signal.cheby2(16, 60, 14600, fs=SR, output="sos")
    return signal.sosfilt(top_cut, cut_below(heard, 67.6, order=4))


dry = scene()
out = record(dry)
to_wav(out)
```